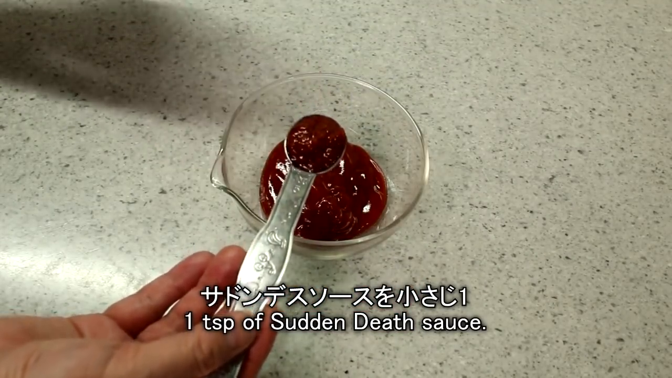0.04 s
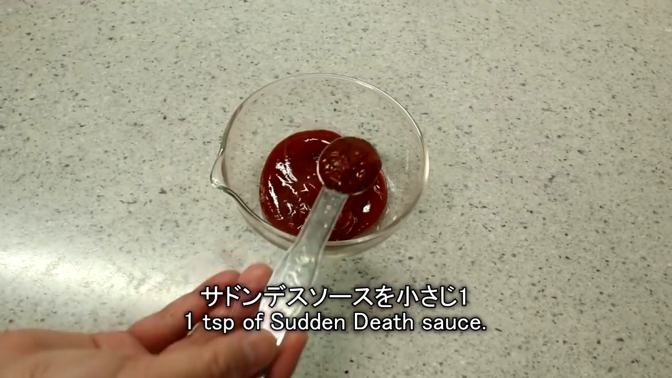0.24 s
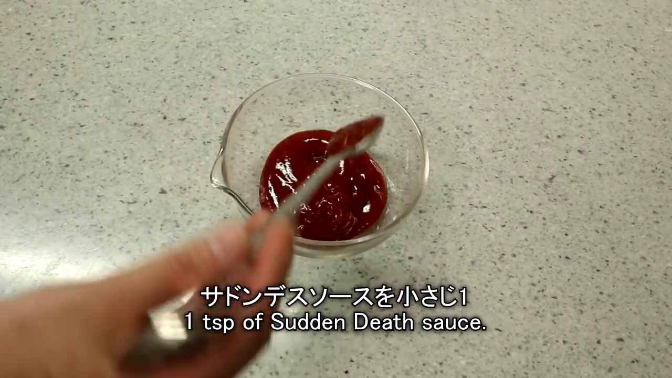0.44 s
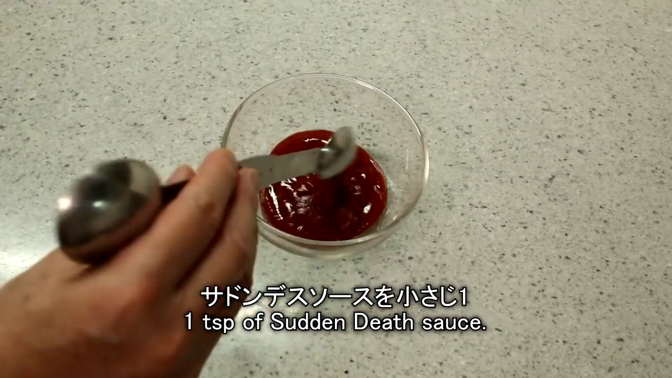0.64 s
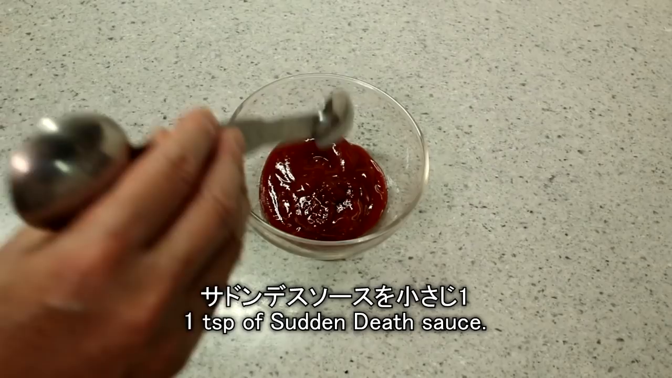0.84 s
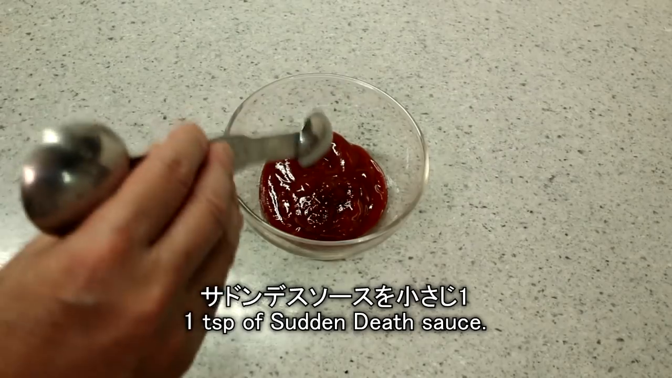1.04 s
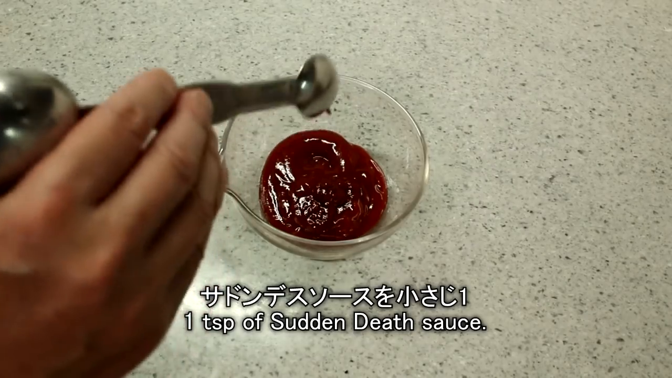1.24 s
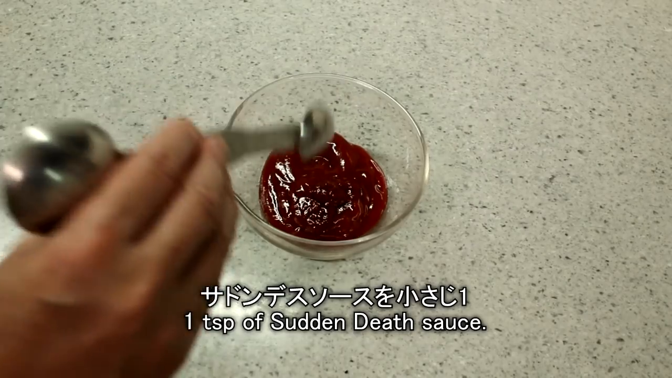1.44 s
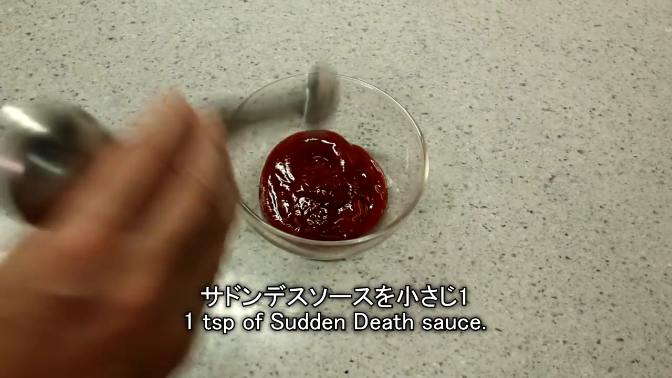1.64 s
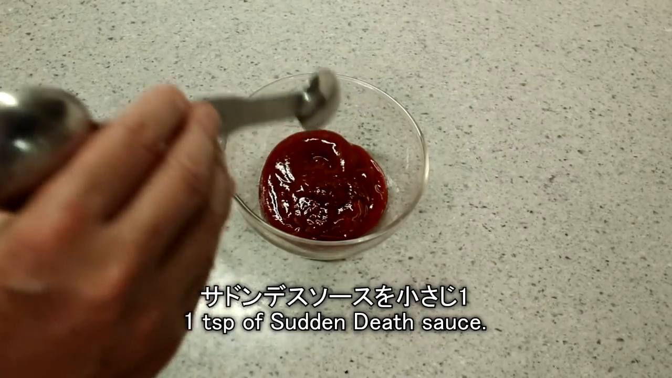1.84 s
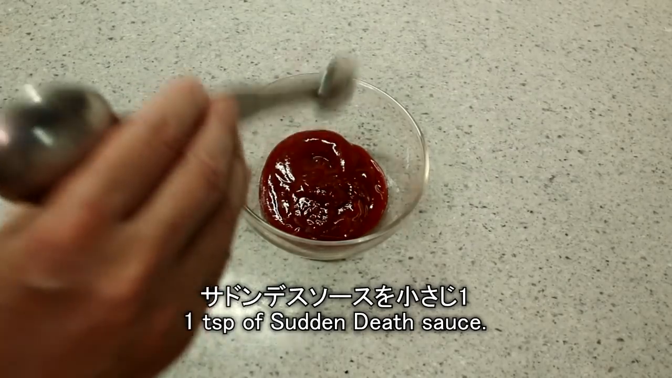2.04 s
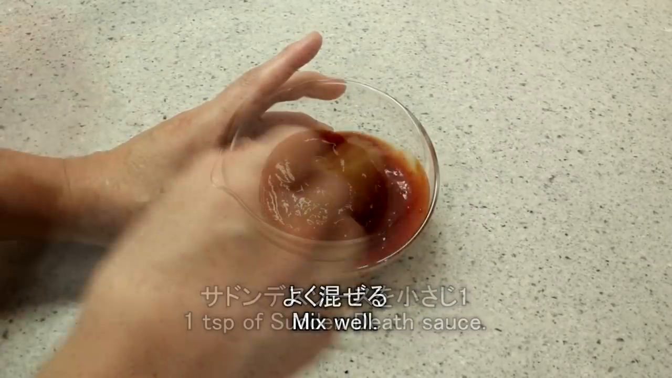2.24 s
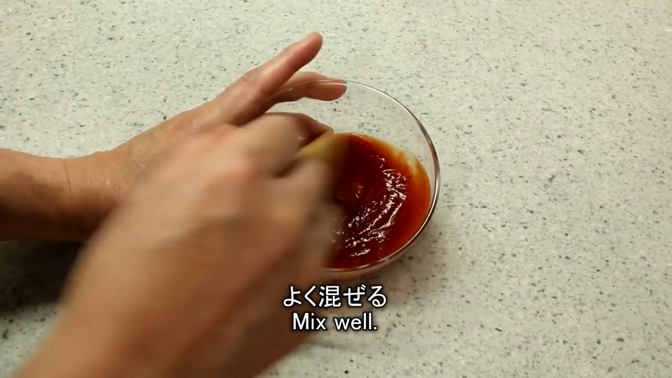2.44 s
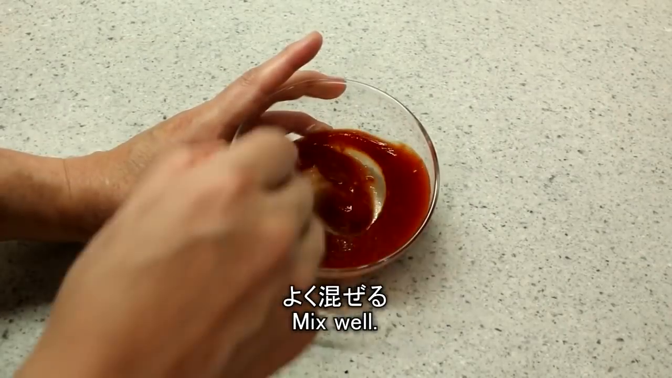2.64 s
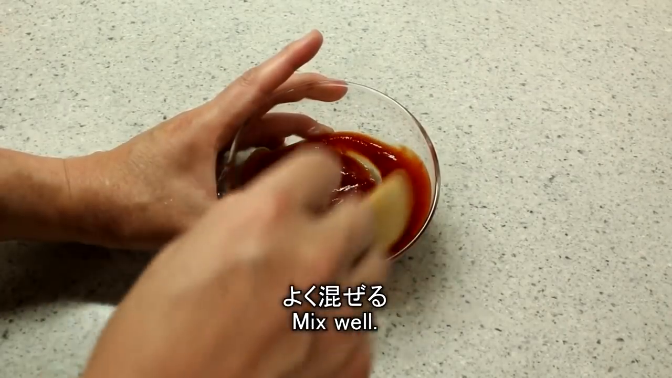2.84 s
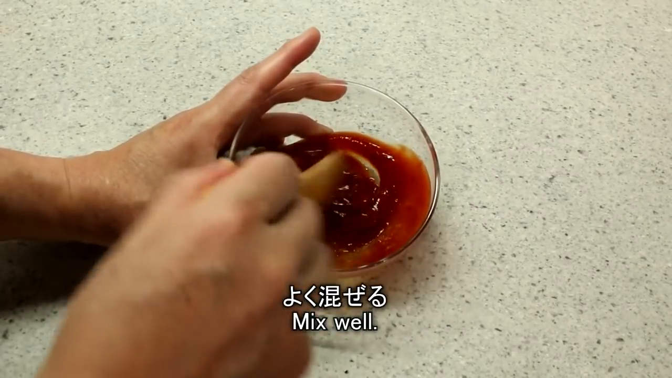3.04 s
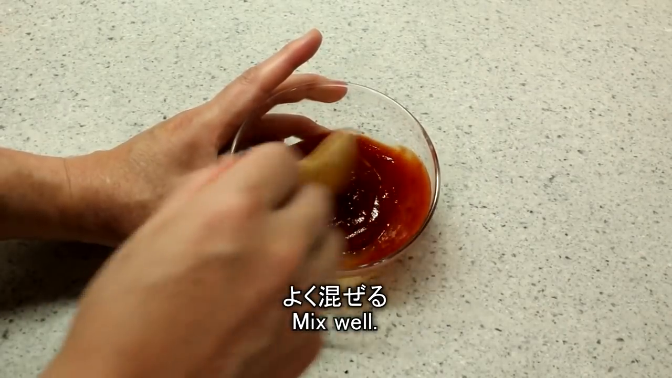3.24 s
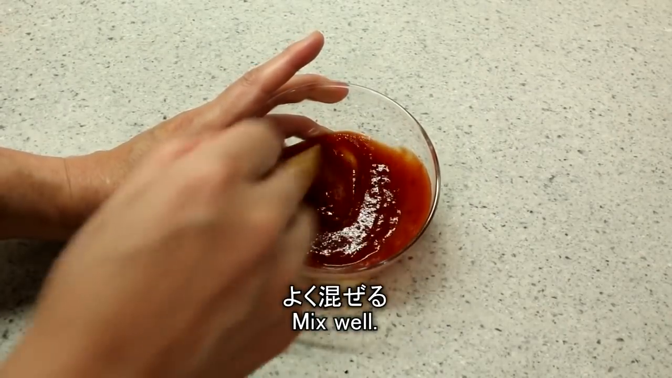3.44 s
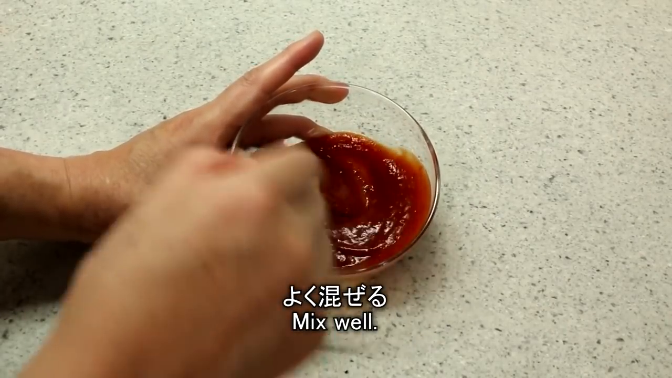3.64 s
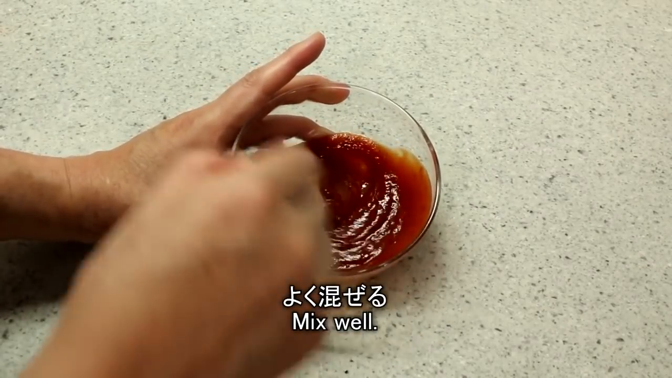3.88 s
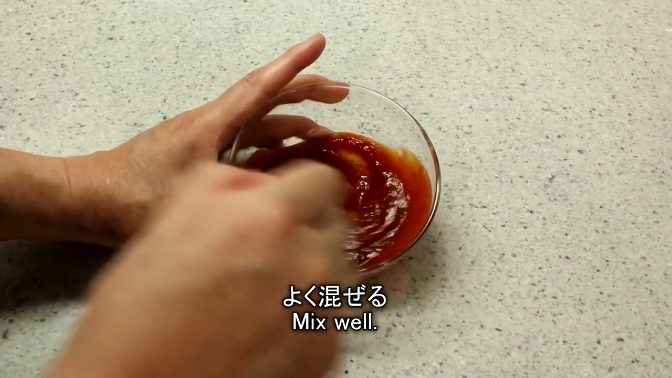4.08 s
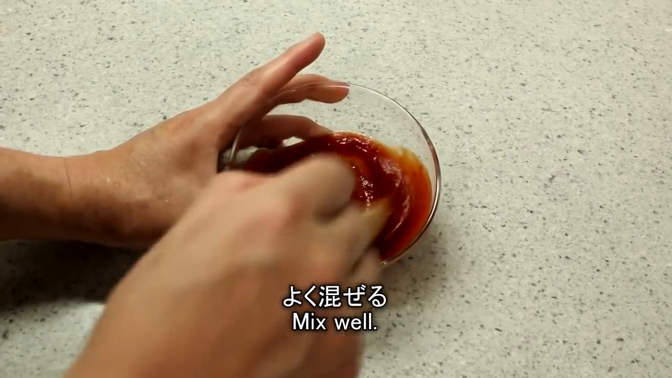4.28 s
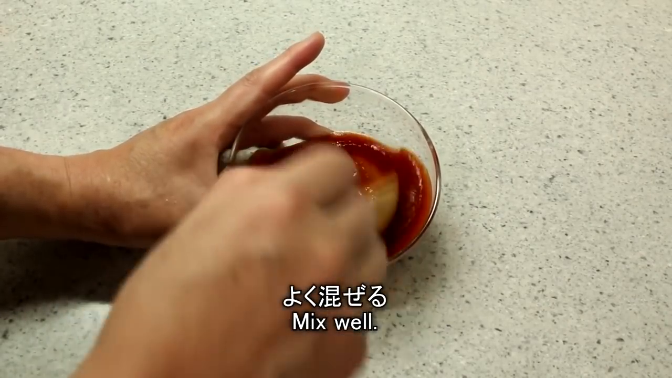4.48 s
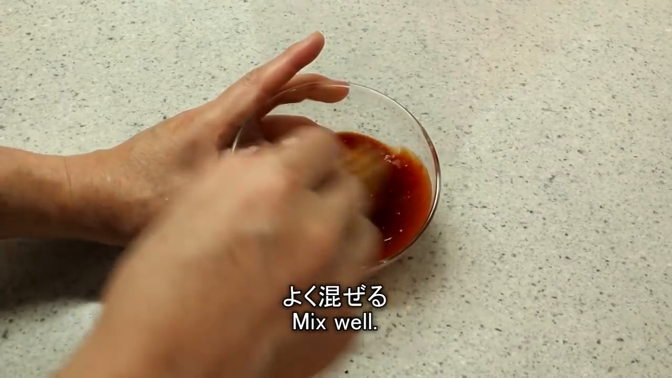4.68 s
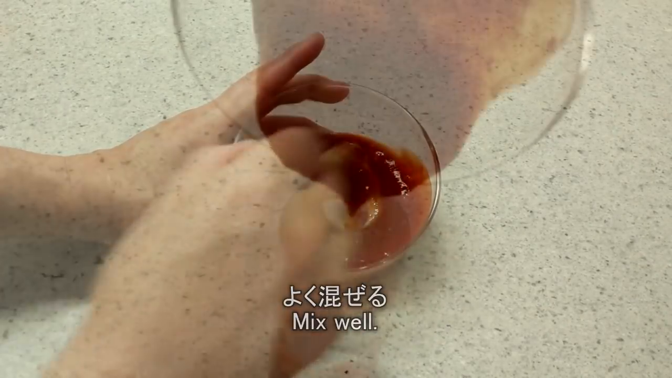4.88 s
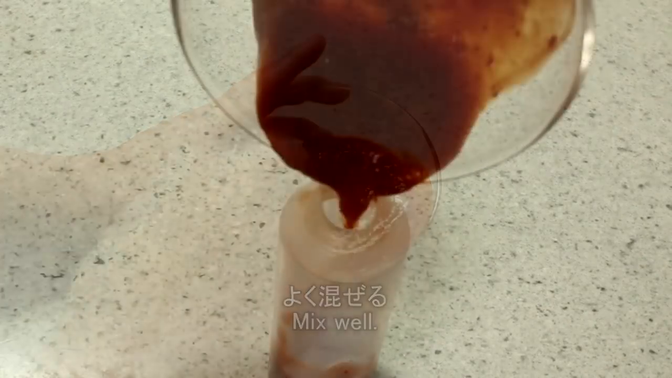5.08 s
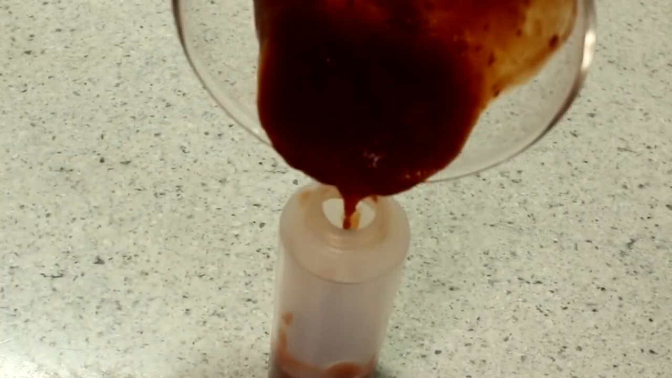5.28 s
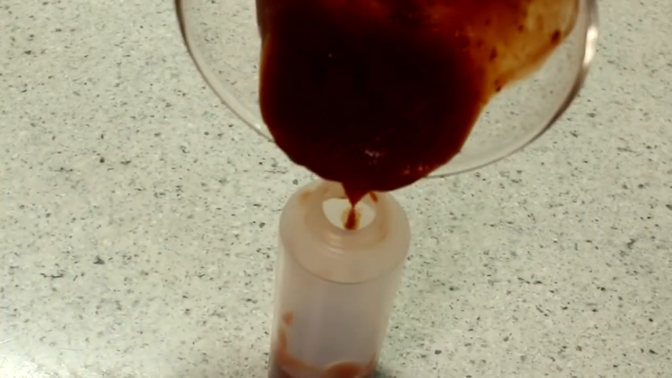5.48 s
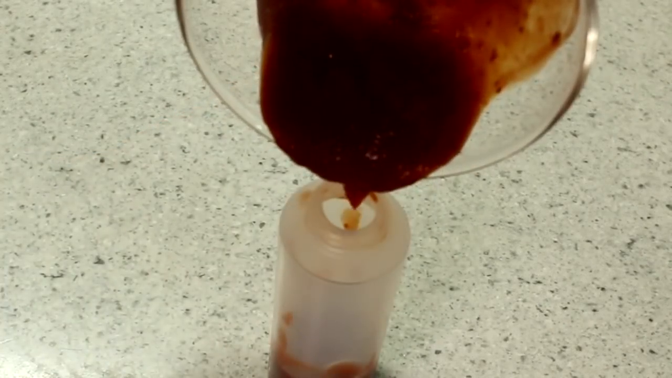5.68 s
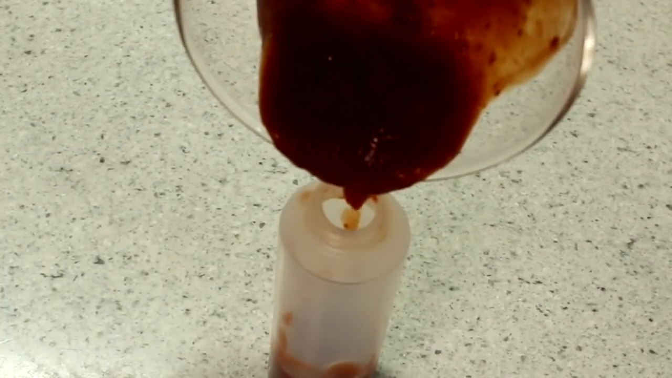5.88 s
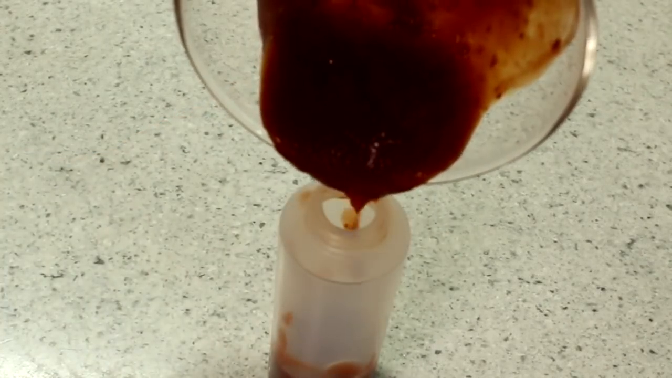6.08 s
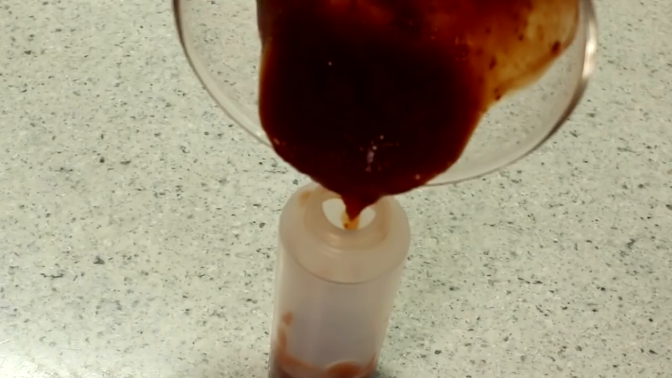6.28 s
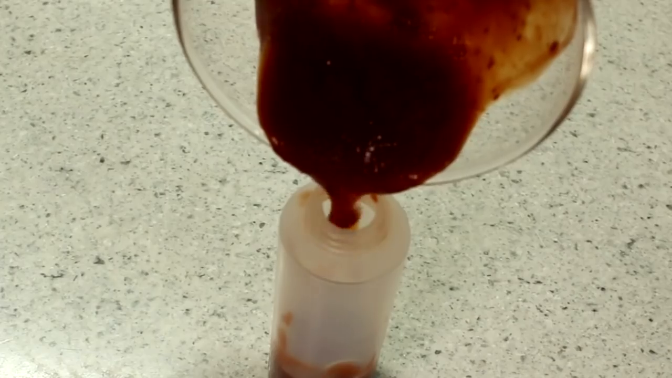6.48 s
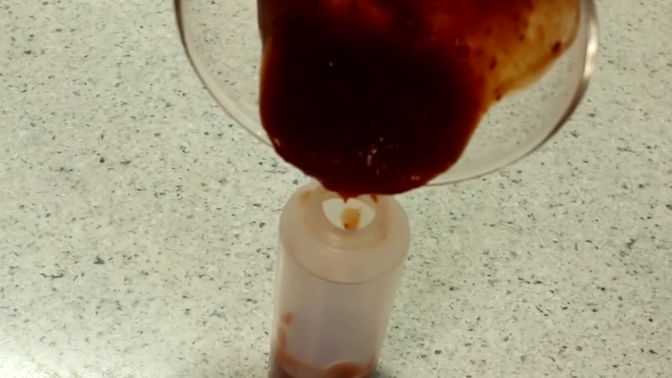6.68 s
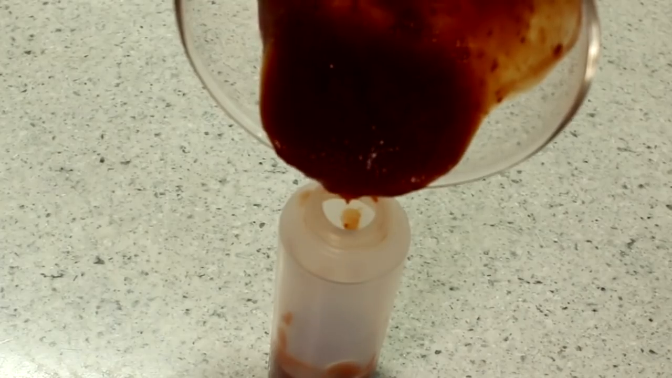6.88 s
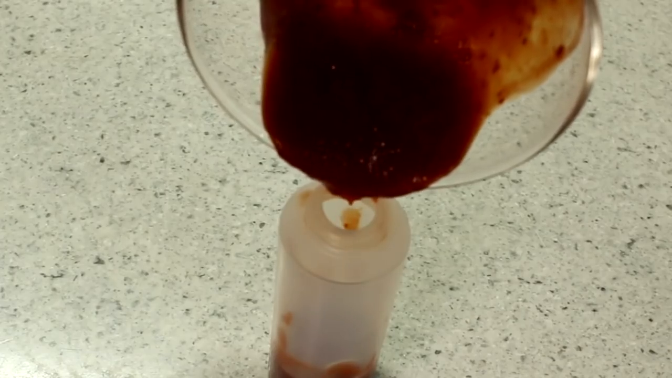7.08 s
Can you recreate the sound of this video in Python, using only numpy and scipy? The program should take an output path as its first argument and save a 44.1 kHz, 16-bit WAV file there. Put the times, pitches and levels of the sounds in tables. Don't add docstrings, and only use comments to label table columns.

```python
import sys
import numpy as np
from scipy import signal
from scipy.fft import rfft, irfft
from scipy.io import wavfile
from scipy.ndimage import uniform_filter1d

SR = 44100
rng = np.random.default_rng(int(sys.argv[2]) if len(sys.argv) > 2 else 0)


def ratio(d):
    e = np.asarray(d, float) / 20
    return 10 ** e


def dump(signal):
    limited = np.clip(np.atleast_2d(signal).T, -1, 1)
    pcm = np.round(limited * 32767).astype(np.int16)
    wavfile.write(sys.argv[1], SR, pcm)


N = 313992

# pitch_hz, density_db_per_hz
HISS = [(24, -30), (40, -4.5), (77, -2.5), (140, -4), (290, -2.5), (345, -7), (402, -2), (503, -8.5),
        (585, -8), (1440, -15), (2200, -18), (4930, -19.5), (6170, -18.5), (16000, -20.5)]
HISS_DB = -59
# pitch_hz, likeness_0_to_1
ALIKE = [(40, 0.97), (300, 0.1), (600, 0.9), (1100, .25), (2000, 0), (3500, 0)]
# pitch_hz, width_hz, level_db
WHINE = [(403, 25, -73), (1136, 6, -83), (1604, 40, -85), (2643, 5, -89), (2767, 5, -87), (4371, 30, -82),
         (5215, 70, -79), (6212, 70, -74), (7327, 40, -86)]
# time_s, level_db
HUM = [
    (4.8, -82),
    (5.26, -71),
    (5.66, -74),
    (6.01, -62.5),
    (6.36, -73),
    (7.12, -70.5),
]
# peak_s, peak_db
GUSTS = [(.42, -55.5), (1.11, -65), (1.44, -63), (1.74, -58.5), (2.0, -61), (2.3, -54.5), (2.47, -53),
         (2.75, -53.5), (3.11, -52.5), (3.29, -54), (3.5, -62), (3.74, -55), (3.95, -55), (4.19, -52.5),
         (4.47, -60.5), (4.75, -56), (4.92, -64), (5.16, -63)]
GUST_RISE_DB_S, GUST_FALL_DB_S, STILL_DB = 109, 150, -78

# centre_hz, level_db, t60_s
ROOM = [(250, -14.5, 0.343), (590, -21.5, 0.3), (1270, -24.5, 0.42), (2600, -21.5, 0.35),
        (5296, -29.5, 0.5), (10600, -24.5, 0.45)]

# start_s, peak_db, pitch_hz
POPS = [(2.693, -35.5, 859), (2.705, -34, 883), (2.771, -40.5, 832), (2.81, -50, 589), (3.282, -39, 643),
        (3.409, -40, 813), (3.417, -39, 649), (3.58, -27, 1140), (3.926, -39.5, 1150), (4.053, -31.5, 966),
        (4.126, -39.5, 479), (4.281, -28.5, 950), (4.66, -33.5, 972), (4.708, -40, 756), (4.948, -26, 563),
        (5.089, -49, 589)]

# pitch_hz, level_db, t60_s, left_minus_right_db, left_lead_rad
BODY = [(486.3, -16, .08, -2, 0.1), (640, -10.5, .02, 2, 0.1), (880, 3, 0.024, 1.5, .4),
        (1067, 20, 0.0086, 5, 0.99), (1200, 6.5, 0.04, -1, 0.37), (1330, -5, .02, 2.5, .7),
        (1510, -6, 0.022, 14, .5), (1640, -5, .015, 1, .4), (772, -1.5, 0.0054, -0.9, .1)]
# pitch_hz, level_db, t60_s, left_minus_right_db, left_lead_rad
RING = [(1988, 1, 0.015, 1.4, 0.23), (2074, 1.5, .045, 2, 0.27), (2205, 5, 0.01, 1, 0.098)]
# pitch_hz, level_db, t60_s, left_minus_right_db, left_lead_rad
CLINK = [(2790, -3.5, .012, -5.5, .4), (3235, -4.5, 0.0059, -10, 0.26), (3940, -2.5, 0.018, -4.5, 1),
         (4400, -5.5, 0.01, -4.5, 0.72), (4960, -0.5, .009, -2.5, 0.76), (5850, -5, 0.013, -0.5, 1),
         (3000, 3, 0.0026, -0.5, .3)]
# pitch_hz, level_db, t60_s, left_minus_right_db, left_lead_rad
RUB = [(3300, -4.5, 0.017, -4, 0.44), (3790, -1, 0.018, -5.5, .6), (4900, -5, .008, -2.5, .4)]
# low_hz, high_hz
CRACK_HZ = [4600, 10720]
SPOT_DB, DETUNE = 1.5, .008

# middle_s, length_s, hiss_db, sauce_drag_db, bare_wall_db
SWEEPS = [(2.051, .1, -58.5, -7.5, -6.5), (2.123, .045, -58, 0.5, 3), (2.421, .06, -51.5, -1.2, 1),
          (2.459, .015, -46.5, 1, 4), (2.484, .033, -42.5, 1.8, 2.2), (2.689, .03, -48.5, -1, -11),
          (2.705, .041, -45, 2, 7), (2.74, .04, -51, -5, -6), (2.781, .02, -57.5, 6.5, 1.5),
          (3.034, .03, -61, 21.5, 23), (3.268, .017, -48, -14, 8.5), (3.306, .04, -43, -3.5, 4),
          (4.12, .06, -55, -4.2, -2), (4.408, .033, -42, -11, -5.5), (4.656, .05, -44, -1, 0),
          (4.695, .017, -41.5, -12, 2.2), (4.881, .031, -50.5, -4.5, -3)]
# blow_s, length_s, hiss_db, bare_wall_db
RUN_UPS = [(2.252, .06, -49.5, -1), (2.559, 0.05, -51.5, -4.5), (3.02, 0.026, -50.5, -7.5),
           (3.076, 0.013, -43.5, -2.5), (3.365, .045, -56.5, 5), (3.488, 0.032, -41, 0.5),
           (3.739, 0.05, -47, 3), (3.972, 0.048, -43.5, 2.5), (4.198, 0.044, -46.5, -2),
           (4.445, 0.022, -44.5, 1.1), (4.752, 0.032, -48, -4.5), (4.907, 0.017, -48, 0),
           (5.172, 0.056, -49, -7.5)]
RUN_UP_LEAD, RUN_UP_DRAG_DB = .55, -4.5
OFF_AFTER_S, OFF_LENGTH_S, OFF_DB, OFF_SHARE = 0.056, .06, -47, 0.51
OFF_DRAG_DB, OFF_WALL_DB = -8.5, -3.5
SLIDE_RING_DB, GRIP_DB = -7, 4

# start_s, force_db, rim_hand_damping_db, sauce_cushion_db, edge_sharpness_db
BLOWS = [(2.25, -14.5, 6.5, 5, -7), (2.345, -36, 3.5, -3.5, -12), (2.556, -11, 10.5, 12.5, 5.5),
         (2.934, -29, 35, 32, 2), (2.971, -18.5, 21, 24.5, -16.5), (3.013, -18.5, 16, 7.5, -3.5),
         (3.077, -14, 23, 10.5, -5.5), (3.171, -23.5, 19.5, 38, -4.5), (3.36, -20.5, 15.5, 23, -2.5),
         (3.491, -11, 10.5, 5.5, -6.5), (3.735, -6.5, 5.5, 3.5, -4.5), (3.974, -9, 11, 11, -4.5),
         (4.198, -9.5, 9, 0.5, -8), (4.444, -8, 8, 5, -6.5), (4.761, -17.5, 15.5, 28, 18.5),
         (4.913, -8, 7, 8, -2.5), (5.172, -23, 12, 23, 0.3), (5.275, -52, 1, -10.5, -4)]
# start_s, clink_db, weight_db, edge_sharpness_db, clink_pitch_hz
TOUCHES = [(2.240, -46.5, -9, -4.5, 4000), (3.050, -43, -12, -11.5, 3500), (3.126, -43, -20, -13.5, 3940),
           (3.219, -54.5, -16, 2.5, 4000), (3.239, -53, -14, 7, 5000), (3.269, -48.5, -12, -1, 3500),
           (3.305, -43.5, -8.5, -9.5, 3940), (3.467, -35, -13, -13.5, 3940),
           (3.563, -49.5, 3.5, -1.5, 3300), (4.206, -28.5, 5, -12, 3000), (4.294, -42.5, -22, -13.5, 5850),
           (4.409, -46.5, -16, -8, 5850), (4.443, -36.5, -10.5, -5.5, 4980), (4.780, -35, -27, 5.5, 4400),
           (.57, -65, -7, 7, 4000), (2.785, -55.5, -16, -2.5, 3940), (2.477, -46.5, -3, -6.5, 3940)]
TOUCH_RING_DB = -1
# body_db, ring_db, clink_db, crack_db
STRIKE_DB = [5.74, 7.64, 11.3, 26.8]
CLINK_HZ, SHORT_ABOVE_DB, OCTAVES_PER_DB = 3850, -22, .05
SKID_S, ECHO_DB = .0012, -16
# pitch_hz, level_under_blow_db, fading_time_s
THUMP = [
    (64.96, -26, 0.012),
    (160, -32, 0.015),
]
THUMP_SHARE = 0.549


def curve(rows):
    s, db = np.transpose(rows)
    return ratio(np.interp(np.arange(N) / SR, s, db, left=-120, right=-120))


def shaped(gain):
    spectrum = rfft(rng.standard_normal(N))
    x = irfft(spectrum * gain(np.arange(1, N // 2 + 2) * SR / N), N)
    return x / x.std()


def on_log(rows, hz):
    f, v = np.transpose(rows)
    return np.interp(np.log(hz), np.log(f), v)


def add(out, s, sound):
    i = int(s * SR)
    out[:, i:i + sound.shape[1]] += sound[:, :N - i]


def hiss():
    def hiss_gain(hz):
        return ratio(on_log(HISS, hz))

    hz = np.arange(1, N // 2 + 2) * SR / N
    alike = on_log(ALIKE, hz)
    mid_share = np.sqrt(np.clip((1 + 0.97 * alike) / 2, 0, 1))
    side_share = np.sqrt(np.clip((1 - alike) / 2, 0, 1))
    mid = irfft(rfft(shaped(hiss_gain)) * mid_share, N)
    side = irfft(rfft(shaped(hiss_gain)) * side_share, N)
    return ratio(HISS_DB + 2.5) * np.array([mid + side, mid - side])


def whines():
    out = np.zeros((2, N))
    for hz, width, db in WHINE:
        line = [shaped(lambda f: 1 / (1 + (2 * (f - hz) / width) ** 2)) for _ in range(2)]
        out += ratio(db) * np.array([line[0], .5 * line[0] + 0.6 * line[1]])
    return out


def late_hum():
    turn = 2 * np.pi * 70.0 * np.arange(N) / SR
    return 1.4 * curve(HUM) * np.array([np.sin(turn + lead) for lead in (0, .4)])


def gusts():
    s, db = np.transpose(GUSTS)[:, :, None]
    late = np.arange(N) / SR - s
    level_db = db + np.minimum(GUST_RISE_DB_S * late, -GUST_FALL_DB_S * late)
    return ratio(np.maximum(np.max(level_db, axis=0), STILL_DB))


def air_on_ports():
    air = [shaped(lambda f: f / 20 / (1 + (f / 25) ** 4)) for _ in range(2)]
    return gusts() * np.array([.9 * air[0], 1.7 * air[1]])


def background():
    return hiss() + whines() + late_hum() + air_on_ports()


def kitchen(dry):
    t, tail = np.arange(SR // 2) / SR, 0
    for hz, db, t60 in ROOM:
        sos = signal.butter(2, [hz / 1.45, hz * 1.45], "bandpass", fs=SR, output="sos")
        own = rng.standard_normal((2, len(t)))
        shared = rng.standard_normal(len(t))
        band = signal.sosfilt(sos, own + 0.77 * shared)
        tail = tail + ratio(db - 22.5) * band * np.exp(-np.log(1000) * t / t60)
    onset = np.clip(t / 0.0017 - .5, 0, 1)
    early = 1 + 3.0 * np.exp(-t / .012)
    return signal.fftconvolve(tail * onset * early, dry.mean(axis=0)[None], axes=1)[:, :N]


def pops(cycles=2.4, glide=25.0):
    out, t = np.zeros((2, N)), np.arange(1024) / SR
    for s, db, hz in POPS:
        ring = np.sin(2 * np.pi * hz * t * (1 + glide * t)) * np.exp(-t * hz / cycles)
        add(out, s + 0.00035, ratio(db + 0.5) * ring * np.array([[1.1], [.9]]))
    return out


def bowl(family_db, wall):
    t, out = np.arange(4096) / SR, 0
    for family, db in zip((BODY, RING, wall), family_db):
        hz, mode_db, t60, pan_db, lead = np.transpose(family)[:, :, None]
        spot = rng.standard_normal((2, len(family), 1))
        gain = ratio(mode_db + SPOT_DB * spot[0])
        level = ratio(db) * gain / np.sqrt(np.sum(gain ** 2))
        fade = level * np.exp(-np.log(1000) * t / t60)
        turn = 2 * np.pi * hz * (1 + DETUNE * spot[1]) * t
        ports = [np.sum(fade * ratio(e * pan_db) * np.sin(turn + e * lead), axis=0) for e in (.5, -.5)]
        out = out + np.array(ports)
    crack = signal.butter(2, CRACK_HZ, "bandpass", fs=SR, output="sos")
    click = signal.sosfilt(crack, 1. * (t == 0))
    out = out * np.minimum(t / .0001, 1) + ratio(family_db[3]) * click
    return signal.sosfilt(signal.butter(4, 490, "highpass", fs=SR, output="sos"), out)


def slides():
    rows = list(SWEEPS)
    for s, length, db, wall in RUN_UPS:
        rows.append((s - RUN_UP_LEAD * length, length, db, RUN_UP_DRAG_DB, wall))
    for s, force, *_ in BLOWS:
        rows.append((s + OFF_AFTER_S, OFF_LENGTH_S, OFF_DB + OFF_SHARE * force, OFF_DRAG_DB, OFF_WALL_DB))
    return [(s, length, db + drag, db + SLIDE_RING_DB, db + wall, db) for s, length, db, drag, wall in rows]


def scrapes():
    out = np.zeros((2, N))
    for s, length, *family_db in slides():
        n = int(1.8 * length * SR)
        chance = rng.standard_normal((3, 8192))[:, :n]
        grip = uniform_filter1d(np.repeat(rng.standard_normal(64), 128), size=128)[:n]
        slips = (chance[0] + 1.0 * chance[1:]) * ratio(GRIP_DB * grip)
        slips = slips / slips.std() * np.hanning(n)
        tick = bowl(np.add(family_db, [-18.0, -20.5, -21, 3.5]), RUB)
        add(out, s - n / SR / 2, signal.fftconvolve(tick, slips, axes=1))
    return out


def contacts():
    rows = []
    for s, db, damping, cushion, edge in BLOWS:
        clink = db - cushion
        clink_hz = CLINK_HZ * 2 ** (OCTAVES_PER_DB * max(clink - SHORT_ABOVE_DB, 0))
        rows.append((s, db, db - damping, clink, clink + edge, clink_hz))
    for s, db, weight, edge, hz in TOUCHES:
        rows.append((s, db + weight, db + weight + TOUCH_RING_DB, db, db + edge, hz))
    return rows


def counter_thump():
    t = np.arange(SR // 10) / SR
    rock, boom = [ratio(db) * np.sin(2 * np.pi * hz * t) * np.exp(-t / fade) for hz, db, fade in THUMP]
    return rock * np.array([[.7], [-1]]) + boom * np.array([[1], [.4]])


def near_echoes():
    t = np.arange(300) / SR
    chance = rng.standard_normal((3, 300))
    scatter = ratio(ECHO_DB) * (chance[:2] + 0.58 * chance[2]) * np.exp(-t / SKID_S)
    small = signal.butter(1, 1500, "highpass", fs=SR, output="sos")
    echoes = signal.sosfilt(small, scatter)
    echoes[:, 0] = 1
    echoes[:, int(.0006 * SR)] += .45
    return echoes


def blows():
    near, far = np.zeros((2, N)), np.zeros((2, N))
    thump = counter_thump()
    spread = 0.23 + 0.75 * np.exp(-np.arange(4096) / SR / 0.0017)
    for s, *family_db, clink_hz in contacts():
        wall = [(hz, db - 15 * abs(np.log2(hz / clink_hz)), *rest) for hz, db, *rest in CLINK]
        tick = bowl(np.add(family_db, STRIKE_DB), wall)
        add(near, s + .001, signal.fftconvolve(tick, near_echoes(), axes=1))
        add(far, s + .001, tick * spread)
        thump_db = min(family_db[0] + 6, THUMP_SHARE * family_db[0] - 6)
        add(near, s + 0.0011, ratio(thump_db) * thump)
    return near, far


def scene():
    near, far = blows()
    stirred = scrapes() + pops()
    return near + stirred + kitchen(1.367 * far + stirred) + background()


def low_pass(x):
    return signal.sosfilt(signal.butter(12, 16250, fs=SR, output="sos"), x)


def record(dry):
    mix = np.clip(dry, -1, 1)
    return low_pass(mix)


dry = scene()
out = record(dry)
dump(out)
```